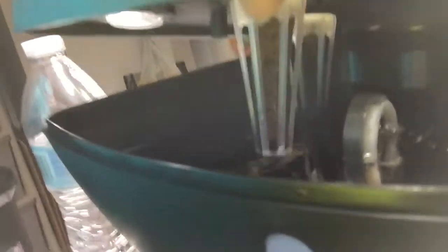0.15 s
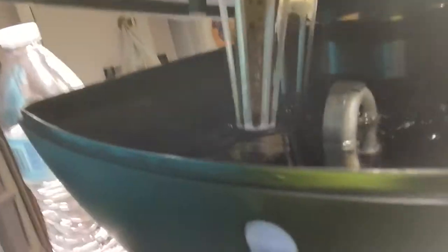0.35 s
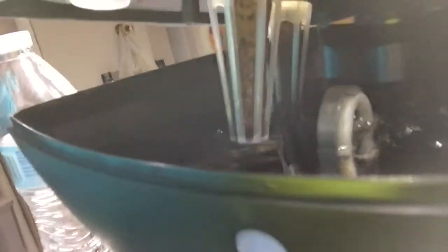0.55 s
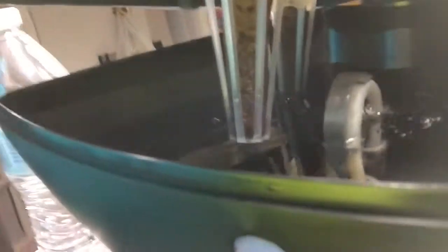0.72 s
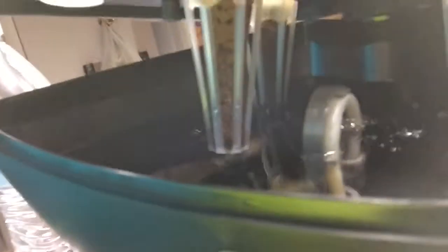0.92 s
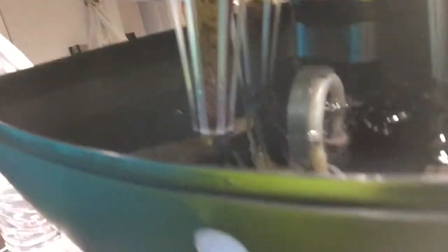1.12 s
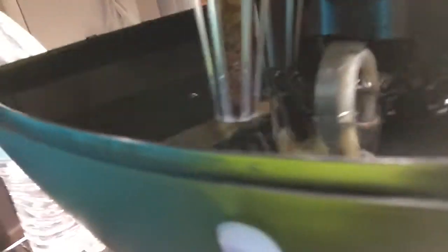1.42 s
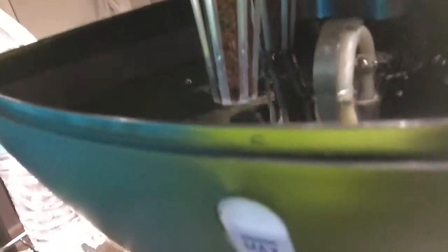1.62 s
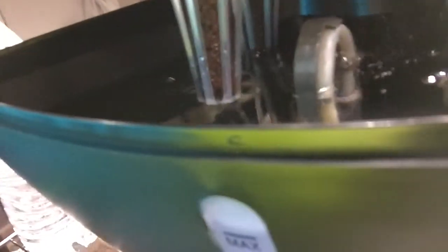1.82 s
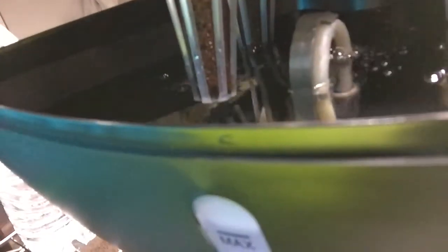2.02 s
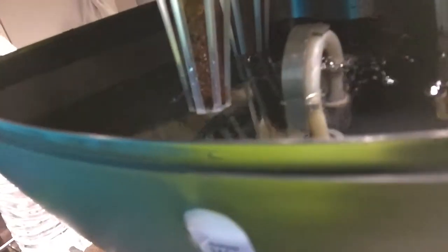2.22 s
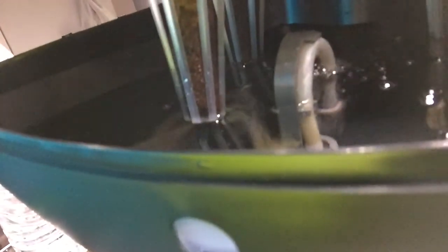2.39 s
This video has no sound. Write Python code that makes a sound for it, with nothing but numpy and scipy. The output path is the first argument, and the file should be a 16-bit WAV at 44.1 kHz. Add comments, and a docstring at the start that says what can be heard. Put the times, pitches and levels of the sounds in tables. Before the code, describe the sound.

Water bubbles steadily from an air stone in a plastic tank, churning low and fizzing at the surface over a pump's hum. Just after the start, a plastic part clicks sharply into place and briefly rattles, in a small room.

```python
"""An air stone bubbles in a plastic hydroponic reservoir, in a small room with a faint hiss.
From the start the pump hums, large bubbles churn low in the tank and tiny ones burst at the
surface in clusters: fizz, faint tinkles, clear pops. At 0.21 s a plastic part clicks into place,
its contacts ringing its modes, with a bright snap from the catch. It rattles three times from
0.27 to 0.37 s and the room answers. Pump and water run on to the end at 2.55 s."""
import sys
import numpy as np
from scipy import signal
from scipy.fft import rfft, irfft, next_fast_len
from scipy.io import wavfile
from scipy.ndimage import uniform_filter1d, map_coordinates

SR = 44100
rng = np.random.default_rng(int(sys.argv[2]) if len(sys.argv) > 2 else 0)


def generate_wav(sig):
    """Save sig (samples, or channels by samples) to the path in sys.argv[1] as 16-bit PCM at SR."""
    pcm = np.round(np.clip(np.atleast_2d(sig).T, -1, 1) * 32767).astype(np.int16)
    wavfile.write(sys.argv[1], SR, pcm)


N = 112454

# low 136 Hz hum, with chance swells and dips: time_s, level_db
LOW_HUM_LEVELS = [(0.0, -50), (0.27, -47.5), (0.33, -49), (0.53, -44), (0.62, -53), (1.25, -54),
                  (1.31, -61), (1.35, -50.5), (1.6, -50), (1.64, -60), (1.69, -45), (1.79, -44),
                  (2.31, -60), (2.37, -38), (2.42, -59), (2.55, -44.5)]
# pump and mains hum: pitch_hz, level_db
HUM_LINES = [(75.4, -69.5), (104.5, -62.5), (149.5, -55.5), (211, -54), (269.2, -64.5), (479.1, -56.5),
             (538.3, -61.5), (602.9, -69.5), (720, -70), (1438.5, -76)]
# churning water: freq_hz, density_db
CHURN_SPECTRUM = [(25, -49.5), (50, -32), (90, -15), (135, -3.5), (175, -3.5), (225, 1), (290, -6.5),
                  (420, -7), (520, -11.5), (570, -16.5), (640, -10), (700, -22), (800, -19), (1300, -21),
                  (1680, -30), (1760, -35.5), (1870, -52.5), (2300, -60), (4000, -78)]
# bursting spray: time_s, level_db
SPRAY_LEVELS = [(0, -72.5), (0.149, -66.5), (.44, -75), (.51, -83), (.64, -71.5), (.91, -69), (1.0, -81.5),
                (1.199, -85.5), (1.329, -71), (1.46, -75), (1.559, -71.5), (1.78, -73), (1.851, -82.5),
                (2.051, -67), (2.159, -84.5), (2.33, -70.5), (2.41, -83), (2.55, -76.5)]
# tiny bubbles: freq_hz, density_db
FIZZ_SPECTRUM = [(3000, -21.5), (4300, -24), (5500, -9), (6300, -6.5), (7300, 4), (9500, 2.5), (11500, 3.5),
                 (12600, -15.5), (14500, -17), (15800, -22.5)]
# mid-sized bubbles: freq_hz, density_db
TINKLE_SPECTRUM = [(1900, 8), (2150, -0.5), (2500, -11.5), (2900, -2), (3500, -6.5), (4400, -14)]
# single clear bubbles: start_s, peak_db, pitch_hz, swell_cycles
CLEAR_POPS = [(0.064, -53, 5840, 14), (.07, -62.5, 2070, 19), (0.104, -67, 5690, 13), (0.19, -59, 5840, 14),
              (0.4426, -64.5, 7550, 7.5), (0.571, -48.5, 11280, 5.3), (.565, -72.5, 3000, 30),
              (.642, -61, 15000, 6.7), (.643, -57, 6740, 5.3), (0.727, -61, 7090, 8.1),
              (.79, -66.5, 1900, 24), (.8, -59.5, 7060, 23), (0.9127, -58, 11250, 8.9),
              (1.0101, -57.5, 7010, 6.9), (1.277, -70.5, 3970, 36), (1.38, -68.5, 3460, 27),
              (1.5259, -53, 7530, 6.4), (1.598, -43.5, 4950, 6.8), (1.645, -60, 7680, 10),
              (1.676, -73, 3900, 25), (1.6945, -56.5, 9060, 9.1), (1.706, -57.5, 7400, 6.8),
              (1.712, -59, 11260, 4.8), (1.7844, -50.5, 8430, 4.1), (1.784, -63.5, 14600, 3.5),
              (1.91, -61, 7040, 9.6), (2.0338, -49, 6210, 8.5), (2.0971, -61, 6230, 12),
              (2.1907, -60, 10600, 7.1), (2.257, -73.5, 4910, 34), (2.3044, -60.5, 7550, 10),
              (2.32, -53.5, 7420, 8.3), (2.513, -66.5, 5000, 24)]
# contacts of the plastic part: start_s, level_db, band_centre_hz, band_width_octaves
PART_CONTACTS = [(0.2094, -27, 1110, 0.45), (0.2163, -12, 1180, 0.62), (.218, -30, 1753, 0.86),
                 (0.2209, -6.5, 2200, 1.1), (0.2231, -10.5, 1000, .7), (0.2228, -10, 225.2, 0.33),
                 (.268, -8, 1352, .3), (0.2695, -16, 604, 2.4), (0.3102, -11, 1080, 1.25),
                 (.3665, -18, 1070, 1.17)]
# modes of the plastic: pitch_hz, level_db, t60_s
PLASTIC_MODES = [(205, -3.5, .07), (285, 4, 0.065), (344, -1.5, 0.058), (640.5, -1, 0.035), (690, -5, .04),
                 (940, -6, 0.023), (1085.7, 4, 0.02), (1355, 2, 0.016), (1624, 1.5, 0.012),
                 (1826, 8.5, 0.0078), (2215, 4, 0.015), (2884, 3.5, 0.0074), (3470, -9, 0.022),
                 (4770, -10, 0.0056)]
# contact noise: freq_hz, density_db
SCUFF_SPECTRUM = [(200, -6), (1500, -0.5), (3800, -1.5), (5200, -22), (9000, -18.5), (15000, -28.5)]
# snap of the catch: freq_hz, density_db
SNAP_SPECTRUM = [(1500, -4), (4000, -6.5), (5600, -6), (6800, -1), (8000, -8), (10000, -14.5),
                 (15000, -15.5)]
# gaps between the plastic's resonances: centre_hz, width_hz
PLASTIC_NOTCHES = [(500, 46), (820, 146.6), (2560, 233), (3280, 90)]
# room decay: freq_hz, t60_s
ROOM_DECAY = [(200, .3), (1000, 0.27), (3000, 0.25), (6000, .2), (14000, .2)]
# room hiss: freq_hz, density_db
HISS_SPECTRUM = [(30, -1), (2000, -12), (5000, -6.5), (11000, -5), (13000, -20.5), (15500, -36.5)]


def amp(db):
    """Decibels to gain."""
    return 10 ** (np.asarray(db) / 20)


def unit(x):
    """Scale to rms 1."""
    return x / np.sqrt(np.mean(x ** 2) + 1e-20)


def decay(t, t60_s):
    """Exponential fall, 60 dB in t60_s."""
    return np.exp(-np.log(1000) * t / t60_s)


def along(points, hz):
    """Interpolate (freq_hz, value) points on a log axis."""
    freq_hz, values = np.transpose(points)
    return np.interp(np.log(hz + 1), np.log(freq_hz + 1), values)


def filtered(x, response):
    """Zero-phase filter with gain response(hz)."""
    size = next_fast_len(len(x) + 8192)
    return irfft(rfft(x, size) * response(np.fft.rfftfreq(size, 1 / SR)), size)[:len(x)]


def coloured(x, spectrum):
    """Shape x by a spectrum; rms 1."""
    return unit(filtered(x, lambda hz: amp(along(spectrum, hz))))


def wobble(knots_per_s):
    """Smooth random curve."""
    return map_coordinates(rng.standard_normal(256), [np.arange(N) * knots_per_s / SR], mode="mirror")


def add(track, start_s, sound):
    """Mix a sound into a track."""
    part = track[max(round(start_s * SR), 0):][:len(sound)]
    part += sound[:len(part)]


def hum(low_hz=136, waver_db=2, drift_rad=.45):
    """Slightly unsteady pump and mains lines, plus a low hum with chance swells and dips."""
    t = np.arange(N) / SR

    def line(hz, rms_db):
        phase = 2 * np.pi * (hz * t + rng.random()) + drift_rad * wobble(3.9)
        return np.sqrt(2) * amp(rms_db) * np.sin(phase)

    low_hum = line(low_hz, np.interp(t, *np.transpose(LOW_HUM_LEVELS)))
    return low_hum + sum(line(hz, db + waver_db * wobble(15)) for hz, db in HUM_LINES)


def bubble(t, hz, t60_s, rise, attack_s):
    """A ringing bubble; pitch climbs by the fraction rise per t60_s."""
    phase = 2 * np.pi * hz * t * (1 + rise * t / t60_s / 2)
    return np.sin(phase) * decay(t, t60_s) * (1 - np.exp(-(t / attack_s) ** 2))


def swarm(per_s, low_hz, high_hz, t60_cycles, attack_cycles, rise, spread_db, samples):
    """Random bubbles, roughly flat in spectrum; rms 1."""
    draws = rng.random((4000, 3))[:int(per_s * N / SR)]
    when, pitch, strength = draws.T[:, :, None]
    hz = low_hz * (high_hz / low_hz) ** pitch
    gain = hz * amp(spread_db * np.minimum(-np.log(1 - strength), np.pi))
    waves = gain * bubble(np.arange(samples) / SR, hz, t60_cycles / hz, rise, attack_cycles / hz)
    positions = ((when * N).astype(int) + np.arange(samples)) % N
    return unit(np.bincount(positions.ravel(), waves.ravel(), N))


def churn(gurgle_db=-49.5, wash_db=-47):
    """Large bubbles from the air stone ring in the tank, over their own blur."""
    gurgle = swarm(per_s=700, low_hz=103.3, high_hz=2000, t60_cycles=20, attack_cycles=.7,
                   rise=.19, spread_db=4, samples=2600)
    wash = coloured(rng.standard_normal(N), CHURN_SPECTRUM)
    return amp(gurgle_db) * coloured(gurgle, CHURN_SPECTRUM) + amp(wash_db) * wash


def tank_echoes(x, t60_s=.027, rise_s=.001):
    """Dense, short echoes off the tank's walls smear x."""
    t = np.arange(SR // 16) / SR
    echoes = rng.standard_normal(len(t)) * decay(t, t60_s) * (1 - np.exp(-t / rise_s))
    return signal.fftconvolve(x, echoes)


def patchy(x, depth_db):
    """Random patches of gain in time and frequency."""
    spectra = signal.stft(x, nperseg=512)[2]
    field = rng.standard_normal(spectra.shape)
    for _ in range(2):
        field = uniform_filter1d(uniform_filter1d(field, size=5, axis=0), size=7, axis=1)
    return signal.istft(spectra * amp(depth_db * unit(field)), nperseg=512)[1][:N]


def fizz(spray_db, offset_db=-2.5, spurt_db=3):
    """Tiny bubbles burst in clumps and quick spurts."""
    bubbles = swarm(per_s=1500, low_hz=3500, high_hz=15800, t60_cycles=25, attack_cycles=5,
                    rise=.03, spread_db=1, samples=900)
    clumps = patchy(tank_echoes(bubbles)[:N], depth_db=7.5)
    return amp(spray_db + offset_db + spurt_db * wobble(36)) * coloured(clumps, FIZZ_SPECTRUM)


def tinkles(spray_db, mean_db=-86.5, swell_share=.45):
    """Mid-sized bubbles ring longer and partly follow the spray's swells."""
    bubbles = swarm(per_s=150, low_hz=1900, high_hz=4400, t60_cycles=230, attack_cycles=25,
                    rise=.01, spread_db=3.5, samples=4400)
    level_db = mean_db + swell_share * (spray_db - spray_db.mean())
    return amp(level_db) * coloured(bubbles, TINKLE_SPECTRUM)


def pop(hz, swell_cycles):
    """One bubble bursts: a short tone smeared by the tank; peak 1."""
    t = np.arange(SR // 16) / SR
    swell = t * hz / swell_cycles
    wave = tank_echoes(np.sin(2 * np.pi * hz * t) * swell ** 2 * np.exp(-swell ** 2))
    return wave / abs(wave).max()


def spray():
    """All bursts at the surface: fizz, tinkles, clear pops."""
    spray_db = np.interp(np.arange(N) / SR, *np.transpose(SPRAY_LEVELS))
    out = fizz(spray_db) + tinkles(spray_db)
    for start_s, peak_db, pitch_hz, swell_cycles in CLEAR_POPS:
        add(out, start_s, amp(peak_db) * pop(pitch_hz, swell_cycles))
    return out


def in_room(x, wet_db):
    """x plus the small room's tail; treble dies sooner."""
    hz, t, spectra = signal.stft(rng.standard_normal(SR // 2), SR, nperseg=256)
    tail = signal.istft(spectra * decay(t, along(ROOM_DECAY, hz)[:, None]), SR, nperseg=256)[1]
    return x + amp(wet_db) * signal.fftconvolve(x, tail / np.linalg.norm(tail))[:N]


def contact(t, centre_hz, width_octaves, lag_s=.0017, attack_s=.00017, scuff_db=-30.5):
    """One contact rings a band of the plastic's modes, with a scuff of noise."""
    hz, mode_db, t60_s = np.transpose(PLASTIC_MODES)[:, :, None]
    age_s = np.maximum(t - lag_s * np.sqrt(500 / hz), 0)  # low bending waves arrive later
    band = np.exp(-.5 * (np.log2(hz / centre_hz) / width_octaves) ** 2)
    drive = amp(mode_db + rng.standard_normal(hz.shape)) * band
    pitch_hz = hz * (1 + .02 * rng.standard_normal(hz.shape))
    envelope = decay(age_s, t60_s) * (1 - np.exp(-age_s / attack_s))
    ring = (drive * np.sin(2 * np.pi * pitch_hz * age_s) * envelope).sum(0)
    scuff = coloured(rng.standard_normal(len(t)), SCUFF_SPECTRUM) * decay(t, t60_s=.074)
    return ring / abs(ring).max() + amp(scuff_db) * scuff


def catch(t, buzz_db=-21.5):
    """The catch snaps; the housing buzzes on briefly."""
    buzz = rng.standard_normal(len(t)) * decay(t, t60_s=.17)
    snap = coloured(rng.standard_normal(len(t)), SNAP_SPECTRUM) * decay(t, t60_s=.027)
    return snap + amp(buzz_db) * buzz


def click(catch_s=.2263, catch_db=-20, low_cut_hz=150):
    """The plastic part seats and rattles; a microphone low-cut thins its bass."""
    out, t = np.zeros(N), np.arange(SR // 5) / SR
    for start_s, level_db, centre_hz, width_octaves in PART_CONTACTS:
        add(out, start_s, amp(level_db) * contact(t, centre_hz, width_octaves))
    add(out, catch_s, amp(catch_db) * catch(t))
    for notch_hz, width_hz in PLASTIC_NOTCHES:
        out = signal.lfilter(*signal.iirnotch(notch_hz, notch_hz / width_hz, SR), out)
    return signal.sosfilt(signal.butter(4, low_cut_hz, "high", fs=SR, output="sos"), out)


def scene(hiss_db=-88.5):
    """Hum, water and click over the room's hiss; mono."""
    mix = hum() + churn() + in_room(spray(), wet_db=-11) + in_room(click(), wet_db=-14)
    hiss = coloured(rng.standard_normal(N), HISS_SPECTRUM)
    return (mix + amp(hiss_db) * hiss)[None]


def record(dry, top_hz=15900):
    """Steep low-pass at the recorder's band limit."""
    return np.array([filtered(x, lambda hz: 1 / np.sqrt(1 + (hz / top_hz) ** 240)) for x in dry])


dry = scene()
out = record(dry)
generate_wav(out)
```